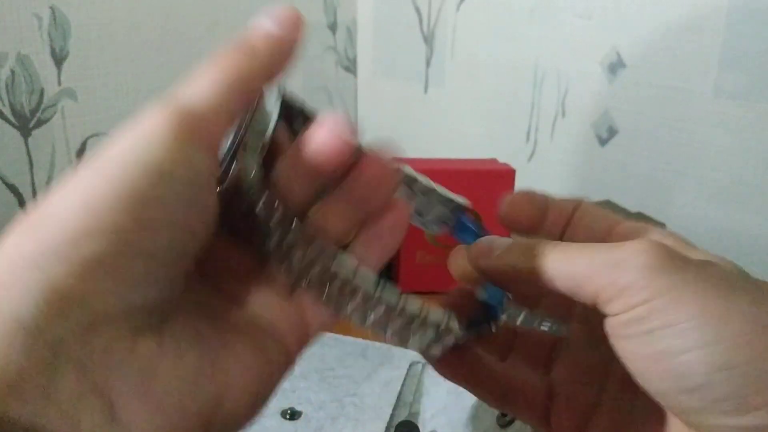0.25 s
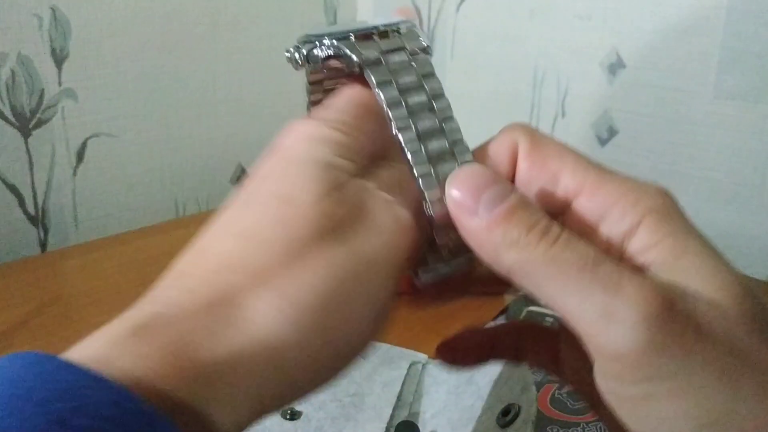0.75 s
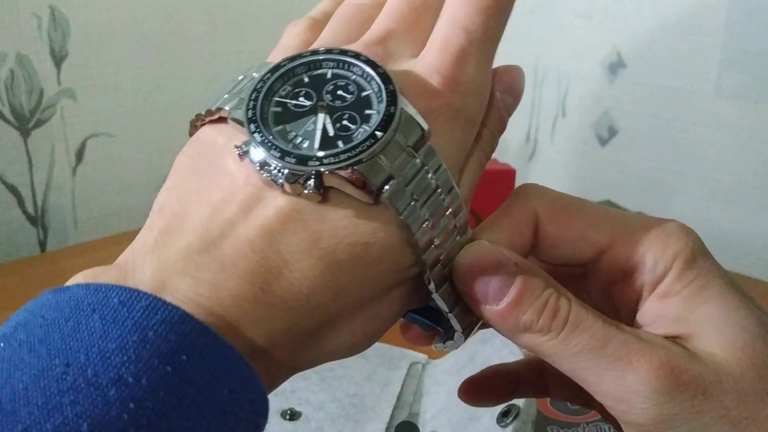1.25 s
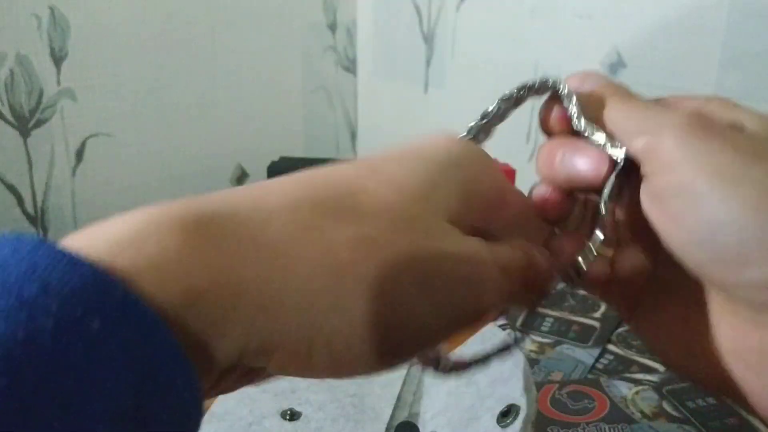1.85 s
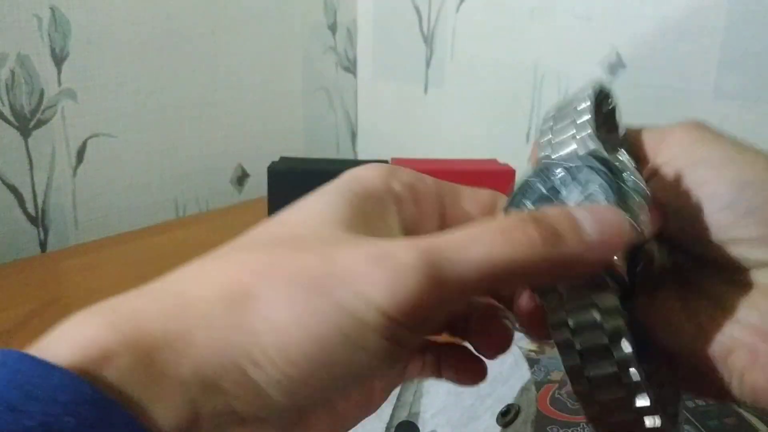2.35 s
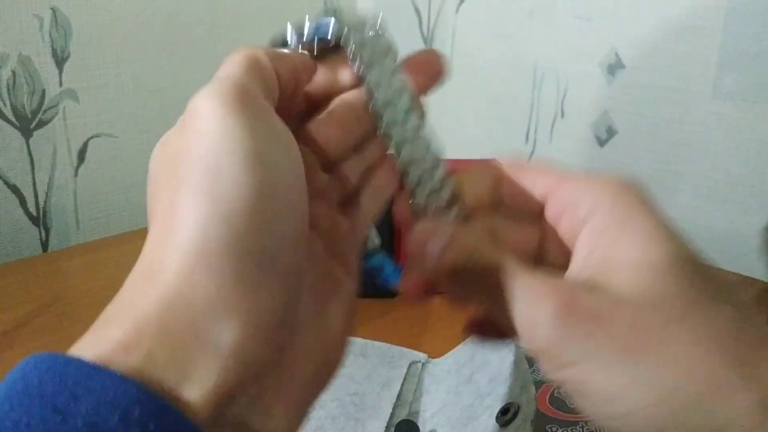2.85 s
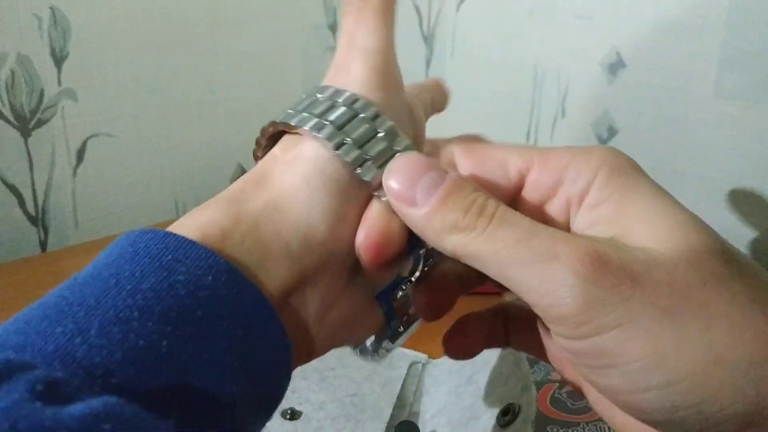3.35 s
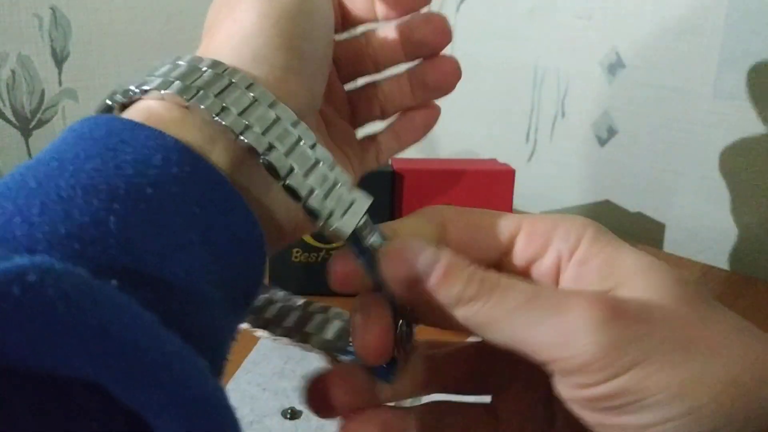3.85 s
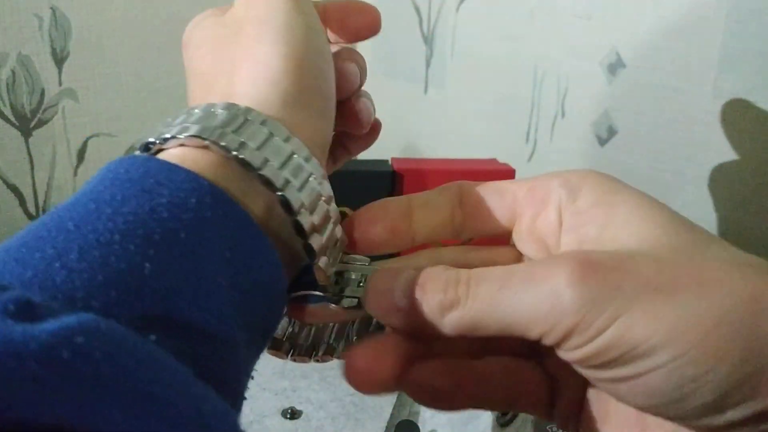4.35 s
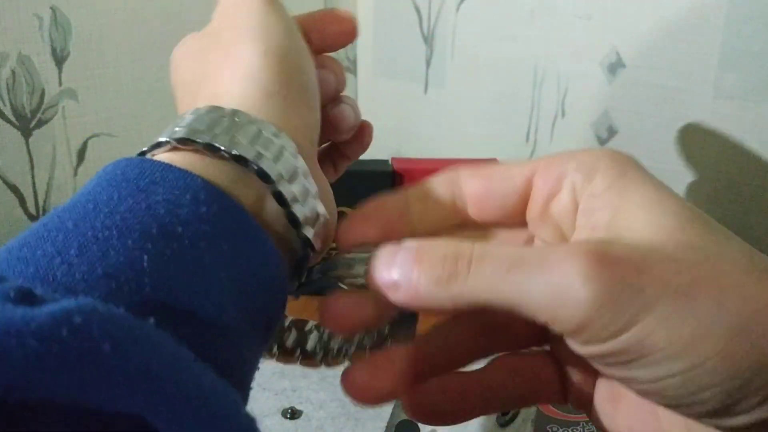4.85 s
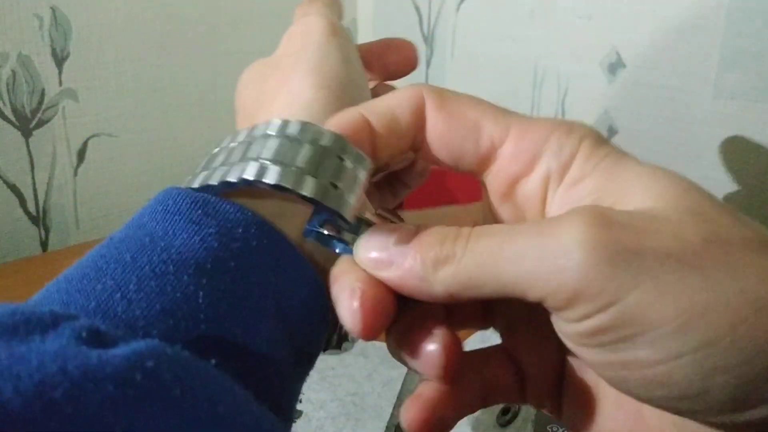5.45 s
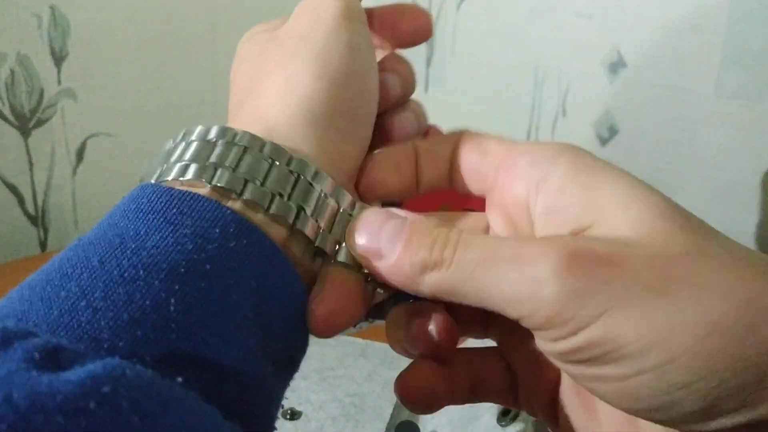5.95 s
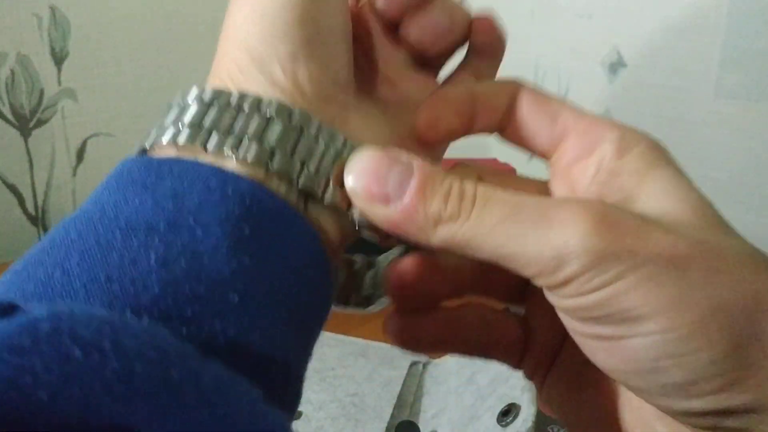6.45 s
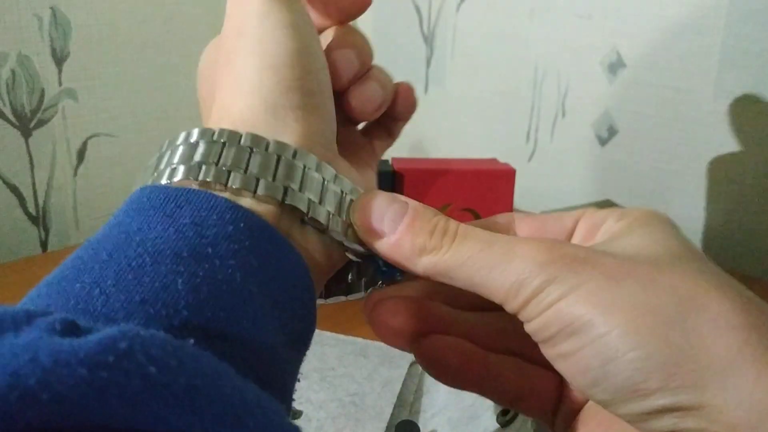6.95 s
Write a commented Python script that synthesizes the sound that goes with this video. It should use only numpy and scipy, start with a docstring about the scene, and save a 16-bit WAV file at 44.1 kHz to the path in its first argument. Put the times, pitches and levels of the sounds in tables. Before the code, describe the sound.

Close, thin metallic ticks and jingles come from the links of a steel watch band being handled indoors. The band rattles and scrapes most as it is pulled onto a wrist, lightly brushing skin and sleeve, then the clasp gives several crisp clicks among smaller link ticks. The hinge squeaks faintly now and then. Behind it are only quiet room tone, a faint wavering hum and occasional soft bumps.

```python
"""A quiet room, close to a pair of microphones: a steel watch bracelet is turned in the hands, slid over
a wrist and clasped. Links click, scrape and bump in runs of tiny contacts that ring the steel and the
watch case and thud in the hand. In between, the whole chain rattles and slides over a rub of skin and
cloth, and a hinge pin squeaks. Room tone, a wavering hum and a few soft thumps lie underneath."""
import sys
import numpy as np
from scipy import signal
from scipy.io import wavfile

SR = 44100
rng = np.random.default_rng(int(sys.argv[2]) if len(sys.argv) > 2 else 0)


def to_wav(s):
    """Save 16-bit WAV."""
    ch = np.atleast_2d(s).T  # columns
    pcm = np.round(np.clip(ch, -1, 1) * 32767)  # PCM
    wavfile.write(sys.argv[1], SR, pcm.astype(np.int16))


N = 317061

# modes of the steel links, large parts first: (pitch [Hz], level [dB])
LINK_MODES = [(3960, 6), (4380, 8), (5010, 7), (5440, -2.5), (6050, 6), (6480, 5), (7050, 0.5), (7500, -2),
              (7930, 2.5), (8520, -4.5), (9040, -4), (9530, -1.5), (10400, -2.5), (10900, -5.5),
              (11800, -1), (12800, -10.5), (13800, -4.5), (14700, -5), (15500, -9.5)]
AT_REST_DB = -67.5   # faint rattle while the chain is held still
THUD_FOLLOWS_CASE = 0.62   # dB more hand thud per dB more case ring, in clicks and scrapes


def from_db(db):
    """Decibels to gain."""
    return 10 ** (np.asarray(db) / 20)


def rms_one(x):
    """Scale to rms 1."""
    return x / np.sqrt(np.mean(x ** 2) + 1e-20)


def with_energy(x, energy):
    """Scale each row to the given energy."""
    return x * np.sqrt(energy / np.sum(x ** 2, axis=-1, keepdims=True))


def at_hz(points, hz):
    """Read a curve on a log-frequency axis."""
    point_hz, values = np.transpose(points)
    return np.interp(np.log(hz), np.log(point_hz), values)


def drift(rate_hz):
    """A smooth random wander of rms about 1."""
    step = 40   # samples between drawn points
    r = np.exp(-2 * np.pi * rate_hz * step / SR)
    slow = signal.lfilter([1], [1, -2 * r, r * r], rng.standard_normal(N // step + 2002))[2000:]
    return np.interp(np.arange(N) / step, np.arange(len(slow)), rms_one(slow))


def band(x, low_hz, high_hz):
    """Band-pass."""
    return signal.sosfilt(signal.butter(2, [low_hz, high_hz], "band", fs=SR, output="sos"), x)


def low_cut(x, hz):
    """Steep high-pass: small parts radiate no lows."""
    return signal.sosfilt(signal.butter(4, hz, "high", fs=SR, output="sos"), x)


def panned(pan_db):
    """Left and right gains, the left pan_db above the right."""
    return from_db(np.array([pan_db / 2, -pan_db / 2]))


def resonator(hz, t60):
    """Filter coefficients of one mode: a unit click starts a decaying sine of height 1."""
    r, w = from_db(-60 / (t60 * SR)), 2 * np.pi * hz / SR
    return [0, np.sin(w)], [1, -2 * r * np.cos(w), r * r]


def ring(drive, hz, t60):
    """Ring one mode at a steady pitch."""
    return signal.lfilter(*resonator(hz, t60), drive + 1e-18)


def room_tone(level_db, patchy_db):
    """Low hum of the house and microphone hiss: half-octave noise bands, each wavering in level."""
    # spectrum of the noise floor: (frequency [Hz], relative density [dB])
    spectrum = [(25, 1), (60, -40), (100, -19.5), (140, -17), (210, 0), (300, -5.5), (420, -7), (700, -11),
                (1300, -13.5), (2300, -15.5), (3600, -17.5), (6000, -21.5), (15000, -17.5), (16500, -38)]
    # how alike left and right are: (frequency [Hz], correlation [-1 to 1])
    likeness = [(60, 0.8), (240, 0.32), (950, -0.1), (3770, 0.078), (15000, -0.68)]
    edges_hz = 25 * 2 ** np.arange(0, 9.6, .5)
    white = rng.standard_normal((2, 2, N))
    out = 0
    for k, (low, high) in enumerate(zip(edges_hz, edges_hz[1:])):
        mid, side = band(white[k % 2], low, high)
        hz = np.sqrt(low * high)
        alike = at_hz(likeness, hz)
        gain = from_db(at_hz(spectrum, hz) + patchy_db * drift(13.8))
        out += gain * (np.sqrt(1 + alike) * mid + np.sqrt(1 - alike) * side * [[1], [-1]])
    return from_db(level_db) * rms_one(out)


def hum(hz, level_db, t60):
    """A wavering hum in the room: noise twice through one low resonance."""
    once = ring(rng.standard_normal(N), hz, t60)
    return from_db(level_db) * rms_one(ring(once, hz, t60))


def thumps(low_hz, high_hz):
    """Soft thumps, as of arms on the table: puffs of low noise that swell and die."""
    # the puffs: (peak time [s], level [dB], rise and fall over 20 dB [s])
    puffs = [(.0, -50.5, 0.042), (0.867, -61, 0.097), (1.872, -56, 0.036), (2.673, -57, 0.063),
             (3.018, -63, 0.052), (3.054, -57.5, 0.18), (5.853, -61, 0.083), (6.06, -58, 0.028),
             (6.418, -54, 0.054), (7.077, -59, 0.075)]
    t = np.arange(N) / SR
    envelope = sum(from_db(db - 20 * np.abs(t - s) / length) for s, db, length in puffs)
    mid, side = band(rng.standard_normal((2, N)), low_hz, high_hz)
    return low_cut(envelope * rms_one(mid + 0.5 * side * [[1], [-1]]), 96)


def slide_levels():
    """Levels in dB of small and large links: each slide swells and dies, and overlaps add in power."""
    # slides and swings of the chain: (peak time [s], small links [dB],
    # large links over small [dB], rise over 20 dB [s], fall over 20 dB [s])
    slides = [(.005, -29.5, 3.5, 0.11, 0.015), (0.131, -47.5, 0.5, 0.12, 0.045), (.26, -45, 1, 0.11, 0.13),
              (0.398, -42.5, -3.5, 0.033, 0.067), (.59, -42, -3.5, 0.11, 0.13),
              (.87, -42, -3.5, 0.23, 0.22), (.98, -57, -5, 0.071, 0.054), (1.62, -45.5, -6.5, 0.09, 0.14),
              (1.79, -37.5, -4.5, 0.13, 0.14), (2.09, -48.5, -2.5, 0.15, 0.14),
              (2.25, -47, -6, 0.055, 0.042), (2.36, -56, -5, 0.043, 0.18), (2.49, -37.5, -5, 0.14, 0.28),
              (2.678, -37.5, -1.5, 0.033, 0.027), (2.87, -47, -6.5, 0.21, 0.17),
              (2.99, -28.5, -6.5, 0.079, 0.13), (3.1, -38, 8.5, 0.094, 0.061),
              (3.269, -33, 2.5, 0.11, 0.12), (3.442, -33.5, 0, 0.068, 0.11), (3.6, -37.5, -4.5, 0.076, 0.1),
              (3.76, -46.5, -8, 0.14, 0.073), (3.83, -50, -12.5, 0.076, 0.25),
              (4.004, -33.5, -7.5, 0.077, 0.082), (4.33, -53.5, -4, 0.28, 0.19),
              (4.55, -58.5, 3, 0.3, 0.057), (4.75, -42.5, -4.5, 0.18, 0.021), (4.87, -47.5, -4, 0.21, 0.17),
              (5.09, -49, -4.5, 0.59, 0.23), (5.21, -61, -16, 0.068, 0.072), (5.4, -53, -3, 0.24, 0.55),
              (5.69, -52.5, 0.5, 0.018, 0.095), (5.82, -45.5, -1, 0.077, 0.14),
              (6.067, -42.5, -0.5, 0.11, 0.054), (6.2, -44.5, -6, 0.083, 0.14),
              (6.281, -46, -4, 0.058, 0.073), (6.42, -44, -7, 0.04, 0.42), (6.54, -44.5, 0.5, 0.17, 0.12),
              (6.71, -39.5, -6, 0.018, 0.054), (6.817, -39, -3, 0.11, 0.042),
              (7.061, -45.5, -0.5, 0.11, 0.11)]
    t = np.arange(0, N + 64, 64) / SR
    peak_s, peak_db, large_over_db, rise, fall = np.transpose(slides)[:, :, None]
    small_db = peak_db - 20 * np.where(t < peak_s, (peak_s - t) / rise, (t - peak_s) / fall)
    powers = [np.sum(from_db(2 * db), axis=0) + from_db(2 * AT_REST_DB)
              for db in (small_db, small_db + large_over_db)]
    return [np.interp(np.arange(N) / SR, t, 10 * np.log10(power)) for power in powers]


def contacts(per_s, spread_db, clump_db):
    """Random touches in clumps, many weak and a few strong, with their own strength at each microphone."""
    touching = rng.random(N) < per_s * from_db(clump_db * drift(40)) / SR
    strength = from_db(spread_db * np.minimum(rng.exponential(1, N), 4))
    return strength * touching * rng.standard_normal((2, N))


def gripped_ring(drive, hz, t60, grip_shift=0.07):
    """A part rings at a pitch that shifts with the grip, about every tenth of a second."""
    block, state, out = 4096, np.zeros((2, 2)), np.empty_like(drive)
    for at in range(0, N, block):
        grip_hz = min(hz * (1 + grip_shift * rng.standard_normal()), 16000)
        span = slice(at, at + block)
        out[:, span], state = signal.lfilter(*resonator(grip_hz, t60), drive[:, span] + 1e-18, zi=state)
    return out


def rattle(touches, parts, cycles, tilt_db_per_oct, neighbour_share=0.45, swing_db=3.5):
    """Each touch rings one part and jolts the others; grip and slack let each part come and go."""
    struck_part = rng.integers(0, len(parts), N)
    lowest_hz = parts[0][0]
    rings = 0
    for k, (hz, db) in enumerate(parts):
        gain = from_db(db + tilt_db_per_oct * np.log2(hz / lowest_hz) + swing_db * drift(23.3))
        drive = touches * np.where(struck_part == k, 1, neighbour_share)
        rings += (-1) ** k * gain * gripped_ring(drive, hz, cycles / hz)
    return rms_one(low_cut(rings, 0.64 * lowest_hz))


def chain(calm_db=11.5, busiest=0.92):
    """The sliding chain: links and case rattle together while skin and cloth rub below."""
    # rub of skin and cloth: (time [s], level over the large links [dB])
    rub_curve = [(0, -16), (.3, -21), (.6, -20), (.9, -14.5), (1.3, -34), (1.75, -24), (2.1, -16.5),
                 (2.5, -20.5), (2.9, -11), (3.1, -28.5), (3.35, -17), (3.8, -19), (4.301, -15.5),
                 (4.8, -14), (5.3, -19), (5.8, -25), (6.1, -12.5), (6.5, -21), (6.8, -20), (7.19, -20)]
    small_db, large_db = slide_levels()
    case_db = large_db.mean() + 0.99 * (large_db - large_db.mean()) - 8
    rub_db = large_db + np.interp(np.arange(N) / SR, *np.transpose(rub_curve))
    ticks = rms_one(contacts(per_s=2000, spread_db=2.0, clump_db=3.5))
    # within calm_db of rest, the separate touches blur into smooth noise
    busy = np.clip((small_db - AT_REST_DB) / calm_db, 0, busiest)
    touches = busy * ticks + np.sqrt(1 - busy ** 2) * rng.standard_normal((2, N))
    case_modes = [(hz, 0) for hz in np.geomspace(2050, 3950, 8)]
    small = from_db(small_db) * rattle(touches, LINK_MODES[9:], cycles=45, tilt_db_per_oct=1.1)
    large = from_db(large_db) * rattle(touches, LINK_MODES[1:9], cycles=42, tilt_db_per_oct=5.5)
    case = from_db(case_db) * rattle(touches, case_modes, cycles=51, tilt_db_per_oct=2.8)
    narrowed = touches + 0.28 * touches[::-1]   # each side bleeds into the other
    rub = from_db(rub_db) * rms_one(band(band(narrowed, 290, 1500), 700, 1790))
    return panned(-1.2)[:, None] * (small + large + case + rub)


def gripped_case_hz(hz):
    """The pitch of the case shifts a little with the grip from knock to knock."""
    return hz * (1 + 0.08 * rng.uniform(-0.33, 1))


def clicks():
    """Rows for knocks(): sharp clicks of links and clasp, each with a slightly softened onset."""
    # the clicks: (time [s], level [dB], link centre [Hz], case ring over links [dB],
    # fall over 10 dB [ms], left over right [dB])
    click_cues = [(0.023, -25, 12300, -15, 0.94, 1), (0.114, -36, 8900, -3, 1, 0),
                  (.1331, -42, 10000, -20, 1, 0), (0.143, -33, 11100, -12, 2.1, 3),
                  (0.186, -37.5, 10800, -18, 1.4, -6), (0.2657, -23.5, 12300, -43, 4, -3),
                  (0.3436, -31.5, 12500, -29, 5.2, 3), (0.5123, -31, 11200, -44, 0.35, -5),
                  (0.519, -34.5, 7700, -16, 2.8, -4), (0.868, -24, 7500, -20, 0.83, -2),
                  (0.886, -39, 8500, -25, .8, 0), (.538, -41, 10000, -9, 3, 3),
                  (0.5762, -31.5, 8840, -12.5, 10, -1), (.659, -49, 10000, -20, 1, -2),
                  (.7441, -37, 9000, -19, 1.5, 0), (0.7347, -27, 10700, -12.5, .5, 0),
                  (0.294, -34.5, 11800, -11, 4, -2), (0.856, -20.5, 9150, -24.5, 5.8, -3),
                  (1.7754, -33, 10900, -18, 1.3, 6), (1.1232, -33, 8200, -35, 0.66, -3),
                  (1.1922, -29.5, 9900, -17.5, 1.1, -5), (1.287, -46.5, 6900, -4, 0.68, -5),
                  (1.455, -47.5, 7700, -13, 1.2, 4), (1.56, -45, 8000, -20, 2.2, -2),
                  (1.585, -32, 13900, -28, 2.6, 3), (1.5984, -16, 11100, -23, 0.31, -6.5),
                  (1.66, -32.5, 8850, -34, 14, -4), (1.747, -36, 9000, -18, 1, 0),
                  (1.815, -35.5, 9000, -3, 1.5, -2), (1.7287, -29.5, 10800, -39, 2.4, 2),
                  (2.0097, -37.5, 12200, -19, 5.7, 2), (2.0698, -49, 10000, -18, 1, 0),
                  (2.0838, -22.5, 8300, -12, 2.7, -3), (2.1945, -36.5, 11700, -27, 4.3, -2),
                  (2.2086, -29, 11300, -12, 0.52, 1), (2.231, -32, 10000, -12, 5.6, 0),
                  (2.2422, -35, 12500, -32, 1.8, -2), (2.2586, -21, 9300, -18, 3.2, 1),
                  (2.2873, -14.5, 12500, -27.5, 0.43, -1), (2.3388, -20, 12000, -25.5, 5.4, 0),
                  (2.3824, -34, 10000, -8.5, 1.1, 0), (2.397, -36, 9900, -22, 1, 0),
                  (2.4392, -33, 10100, -9.5, 3.7, -5), (2.4456, -33, 11000, -20, 1, 2),
                  (2.465, -26.5, 11600, -11.5, 2.4, 9), (2.532, -29, 11000, -18, 1.4, -1),
                  (2.5375, -38, 9500, -22, 1, 0), (2.694, -24, 8500, -29, 1.5, -2),
                  (2.769, -33.5, 6300, -14.5, 7.4, 1.5), (2.8233, -27, 9700, -38, 1.4, -3),
                  (2.835, -42, 12600, -26, 1.7, 9), (2.842, -43, 9200, 1.5, 1.4, 2),
                  (2.873, -34, 6940, -17, 1.5, 1), (2.8591, -42, 11000, -29, 1.5, 0),
                  (2.8852, -23, 11100, -17, 0.54, -1), (2.898, -29.5, 9300, -16.5, 8.1, -1),
                  (2.9333, -21.5, 7200, -19, 1.9, -1), (3.212, -34, 6000, -28, 4.2, -11),
                  (3.3231, -33, 7000, -25, 1.1, -6), (3.397, -29, 6840, -33, 2.8, -16),
                  (3.412, -26, 7600, -31, 1.4, -5), (3.417, -26.5, 4770, -13, 23, -4),
                  (3.5828, -25.5, 9000, -42, 7.5, -6), (3.6593, -18, 12100, -25, 2.4, -1),
                  (3.615, -35, 10000, -23, 1, 2), (3.695, -32, 10100, -21, 1, 0),
                  (3.7354, -29, 11200, -48, 3.1, 1), (3.8293, -28.5, 9000, -6, 1.5, 1),
                  (3.8105, -15, 12300, -33, 0.67, -2), (3.8142, -34, 7540, -15, 2.1, 4),
                  (3.8367, -37, 7500, -10, 1.5, 0), (3.842, -46, 9000, 4, 3.4, 1),
                  (3.8253, -23, 11000, -19.5, 2.4, 3), (3.9044, -32, 11000, -25, 1, 2),
                  (3.9138, -24.5, 12300, -20, 2, 1.5), (3.918, -29, 10000, -15, 1.6, -1),
                  (3.9695, -31, 8000, -16, 0.87, -7), (3.9475, -31, 10700, -28, 1.4, -1),
                  (3.978, -18, 9600, -14, 0.77, -2), (4.046, -22, 11900, -19.5, 1.1, 2),
                  (4.076, -29, 8900, -18, 0.44, -2), (4.102, -28.5, 8200, -22, 1.1, -2),
                  (4.154, -33, 13500, -35, 2.4, 2), (4.1606, -25, 12700, -21, 0.47, 0),
                  (4.174, -33.5, 7700, -22, 2.5, -5), (4.241, -41, 10900, -20, .8, -1),
                  (4.277, -34.5, 11200, -22, 0.68, -7), (4.286, -46, 11000, -23, 1.5, -1),
                  (4.466, -50, 6000, 0, 0.8, -2), (4.587, -35, 11200, -16, 0.7, -2),
                  (4.644, -40, 11300, -23, 1.9, -3), (4.6632, -45, 10000, -25, 1, -5),
                  (4.7052, -19.5, 11000, -39, 0.6, -6), (4.723, -33, 7900, -20, 1.9, 3),
                  (4.7388, -12, 9300, -34, 0.68, -3), (4.7407, -27, 8950, -33, 2.3, 0),
                  (4.7894, -11, 6030, -20.5, 0.8, 1), (4.7896, -21, 12100, -30, 1.5, -4),
                  (4.8105, -21, 9000, -17, 1.3, -3), (4.855, -30, 10000, -22, 1.1, 0),
                  (5.069, -32, 12400, -21, 0.28, 0), (5.076, -29.5, 11600, -18.5, 5.6, 1),
                  (5.107, -27, 13300, -40, 3.5, -5), (5.1913, -8, 12200, -39, 0.14, 2.5),
                  (5.303, -30.5, 13700, -42, 1.4, -5), (5.3414, -25, 9000, -18.5, 2.1, 1),
                  (5.418, -25, 9100, -30, 0.88, -6), (5.4401, -17, 12600, -18.5, 0.18, -1),
                  (5.579, -38, 11000, -27, 0.89, -5), (5.596, -22.5, 6100, -11.5, 1.36, -2),
                  (5.6412, -30, 10600, -34, 0.34, -6), (5.721, -44, 10000, -10, 1, 0),
                  (5.7481, -27.5, 9300, -20, 1.5, -2), (5.79, -34, 10700, -30, 1.2, -7),
                  (5.753, -28, 9800, -6, 1.3, -2), (5.782, -34, 9000, -24, 1.5, -3),
                  (5.8, -36, 11000, -25, .8, -4), (5.81, -20, 11300, -28, .4, 3),
                  (5.8173, -15.5, 11800, -29, 0.33, -6), (5.835, -34, 11000, -8, 4.5, 8),
                  (5.8475, -22, 8400, -6, 2.8, 0), (5.9732, -31.5, 10200, -13.5, 2, -4),
                  (5.9204, -41, 11000, -22, 1.2, -1), (6.0632, -41, 12000, -22, .6, -3),
                  (6.065, -37, 12300, -6, 1.5, -2), (6.0783, -34, 9000, -14, .6, 0),
                  (6.1656, -41, 8900, -15, 1.6, -4), (6.203, -36, 8000, -15, 2, -11),
                  (6.341, -35, 8000, -7, 1.1, -1), (6.3445, -29.5, 6800, -6, 2.2, -5),
                  (6.378, -20, 6400, -25, 1.3, -8.5), (6.361, -47, 12000, -25, 1.5, 0),
                  (6.416, -37, 10000, -25, 1.5, 2), (6.4642, -26, 11900, -21, 1.9, 1),
                  (6.612, -31.5, 9800, -43, 3.4, 1), (6.6592, -28.5, 9700, -43, 4, 4),
                  (6.673, -20.5, 10400, -38, .4, -6), (6.686, -31, 12300, -70, 2.5, 9),
                  (6.6996, -33, 7000, -11, 1.5, 0), (6.7193, -23.5, 9800, -26, 5.3, -2.5),
                  (6.805, -19, 7900, -24, 1.9, -4), (6.834, -31, 10400, -35, 3.9, -1),
                  (6.8576, -33, 12000, -33, 1.7, 0), (6.9364, -39, 10000, -25, 1.9, 0),
                  (6.9834, -44, 9000, -25, 1, -4), (7.0108, -47, 10000, -25, 1, 0),
                  (7.163, -38.5, 9900, -27, 1, -5), (6.906, -35, 6600, -27, 1.6, -3),
                  (6.921, -42, 9700, -14, 2.5, -3), (7.0343, -36, 8900, -9, 3.4, -14)]
    rows = []
    for s, db, link_hz, case_db, fall_ms, pan_db in click_cues:
        thud_db = -23 + THUD_FOLLOWS_CASE * case_db
        rise_ms = 0.57 + 0.27 * fall_ms
        rows.append((s, db, link_hz, gripped_case_hz(2660), case_db, thud_db, rise_ms, fall_ms, pan_db))
    return rows


def contact_runs(envelope, peak_at, alike=0.37, grain_db=1.5, strike=2.33):
    """Grainy runs of tiny contacts: a part both microphones share, and a part of their own for each."""
    count, _, size = envelope.shape
    white = rng.standard_normal((count, 3, size))
    grain = from_db(grain_db * rng.standard_normal((count, 1, size // 8)).repeat(8, axis=2))
    runs = envelope * grain * white
    shared, own = runs[:, :1], runs[:, 1:]
    shared[:, :, peak_at] = strike * np.sign(shared[:, :, peak_at]) / alike   # one firm contact on top
    # three blends, to drive link, case and hand
    return alike * shared + (1 - alike) * own, shared + 1.32 * own, shared + 0.19 * own


def link_ring(drive, centre_hz, spread_oct=0.25, cycles=33):
    """A struck link: modes near its centre ring loudest, a little differently at each microphone."""
    mode_hz, mode_db = np.transpose(LINK_MODES)
    weight_db = mode_db - 3 * (np.log2(mode_hz / centre_hz) / spread_oct) ** 2
    weight_db = weight_db + rng.normal(0, 0.4, (len(drive), 2, len(mode_hz)))
    modes = sum(from_db(weight_db[:, :, [k]]) * np.sqrt(hz) * ring(drive, hz, cycles / hz)
                for k, hz in enumerate(mode_hz))
    return low_cut(low_cut(np.diff(modes, prepend=0), 2720), 2670)


def case_ring(drive, centre_hz, spread_oct=0.36, cycles=8.5):
    """The struck case: a short, lower ring, loudest near its centre, through each resonance twice."""
    modes = 0
    for k, hz in enumerate(np.geomspace(950, 3900, 11)):
        gain = hz * from_db(-3 * (np.log2(hz / centre_hz) / spread_oct) ** 2)
        modes += (-1) ** k * gain * ring(ring(drive, hz, cycles / hz), hz, cycles / hz)
    return low_cut(modes, 740)


def hand_thud(drive, hz=588):
    """The hand takes the knock as a dull band of noise."""
    return low_cut(band(drive, 0.6 * hz, 2.57 * hz), 193)


def table_ring(drive):
    """The table rings low under the thuds."""
    # modes of the table: (pitch [Hz], gain [dB], decay over 60 dB [s])
    table_modes = [(304, -33.5, 0.021), (404, -54, 0.23)]
    return sum(from_db(db) * ring(drive, hz, t60) for hz, db, t60 in table_modes)


def knocks(rows, trim_db, max_lag_samples):
    """Each knock is a run of contacts that swells and dies, sounding link, case, hand and table."""
    size, lead = 2048, 640   # samples in a knock, and ahead of its peak
    columns = np.transpose(rows)[:, :, None, None]
    s, level_db, link_hz, case_hz, case_db, thud_db, rise_ms, fall_ms, pan_db = columns
    ms = (np.arange(size) - lead) / SR * 1000
    envelope = from_db(np.where(ms < 0, 10 * ms / rise_ms, -10 * ms / fall_ms))
    link_drive, case_drive, hand_drive = contact_runs(envelope, lead)
    # the ring outlasts the shortest contacts and adds to their energy
    energy = np.sum(envelope ** 2, axis=2, keepdims=True) + 12
    link = with_energy(link_ring(link_drive, link_hz), energy)
    case = from_db(case_db) * with_energy(case_ring(case_drive, case_hz), energy)
    thud = from_db(thud_db) * with_energy(hand_thud(hand_drive), energy)
    blows = from_db(level_db + trim_db) * (link + case + thud)
    # off the middle, a knock reaches one microphone a little later
    lags = np.round(max_lag_samples * rng.uniform(-1, 1, len(rows))).astype(int)
    starts = np.round(s.ravel() * SR).astype(int)
    out = np.zeros((2, N + size + 20))
    for at, lag, blow, gains in zip(starts, lags, blows, panned(pan_db.ravel()).T):
        out[0, at + lag:at + lag + size] += gains[0] * blow[0]
        out[1, at:at + size] += gains[1] * blow[1]
    out = out[:, lead:N + lead]
    return out + table_ring(out)


def bumps(rise_ms=1, pan_db=-1.5):
    """Rows for knocks(): heavier blows of steel against case, hand or wrist."""
    # the bumps: (time [s], level [dB], link centre [Hz], case centre [Hz],
    # case ring over links [dB], thud over links [dB], fall over 10 dB [ms])
    bump_cues = [(0.079, -32.5, 10400, 2920, -9.5, -12, 1.3), (0.7595, -19.5, 11600, 2600, -10, -19.5, 3.8),
                 (1.0663, -39, 10000, 2600, -20, -32, 1), (1.057, -19, 8200, 2840, -8, -22, 0.47),
                 (2.6305, -38, 12100, 2870, -27, -17, 1.5), (3.373, -26, 10900, 2760, -17, -11.5, 2.8),
                 (3.8104, -25.5, 7900, 3400, 2, -63, 0.57), (3.885, -38.5, 11000, 2550, -10, -15.5, 16),
                 (3.982, -25.5, 9600, 1360, -13.5, -45, 8.2), (4.942, -32, 7740, 2660, -7, -16, 3.6),
                 (4.986, -27.5, 9500, 1350, -29, -15, 0.23), (5.517, -26, 11600, 2260, -14.5, -28, 2.7),
                 (6.2702, -40, 10200, 1030, 5, -4, 0.93), (6.305, -38.5, 9000, 2590, -7, -31, 2.4),
                 (6.554, -48, 9000, 1220, -7, 2, 0.69), (6.377, -12.5, 10600, 1280, -21.5, -11, 0.81),
                 (7.041, -19, 7560, 2100, -14.5, -24, 1.7)]
    return [(*bump, rise_ms, fall_ms, pan_db) for *bump, fall_ms in bump_cues]


def scrapes(usual_db=-28.5, pan_db=-2):
    """Rows for knocks(): links dragged over links; strong scrapes hang free of the hand and thud less."""
    # the scrapes: (peak time [s], level [dB], link centre [Hz], case ring over links [dB],
    # rise over 10 dB [ms], fall over 10 dB [ms])
    scrape_cues = [(0.2263, -36.5, 10000, -11.5, 4.5, 11), (0.3994, -35.5, 7600, -10.5, 31, 4.1),
                   (0.601, -36.5, 9500, -15.5, 20, 19), (0.846, -31, 10900, -14, 10, 3.8),
                   (0.8723, -28, 7900, -29, 16, 26), (0.9333, -26, 7800, -12, 1.4, 0.27),
                   (1.648, -33, 9300, -12.5, 4.7, 2.6), (1.771, -32, 10900, -31, 8.5, 4),
                   (1.7921, -21, 12100, -12.5, 2, 9.4), (2.499, -34, 10100, -6.5, 7.6, 4),
                   (2.6689, -30.5, 10400, -3, 2.9, 1.4), (2.9728, -16.5, 8360, -41, 6.7, 1.4),
                   (2.983, -10.5, 9500, -18, 3.2, 6.7), (3.051, -23.5, 9000, -19, 6.8, 7.9),
                   (3.0871, -24.5, 9800, -10, 1.2, 15), (3.1, -21, 10500, -31, 14, 14),
                   (3.233, -15.5, 5840, -31, 5.4, 7.9), (3.2578, -22.5, 5900, -37, 27, 28),
                   (3.278, -30.5, 6270, -20, 18, 94), (3.427, -26, 9100, -20, 14, 12),
                   (3.46, -36, 7300, -15, 11, 58), (3.482, -25, 7700, -13, 10, 10),
                   (3.368, -27.5, 10700, -13, 13, 14), (3.6154, -40.5, 11500, -7, 14, 2.8),
                   (4.54, -38, 9200, -7, 3.1, 3.4), (4.745, -28, 10100, -39, 4.1, 1.3),
                   (4.883, -31.5, 9900, -19, 24, 4.2), (6.456, -26.5, 9500, -18, 4.4, 6.8),
                   (6.5168, -32, 10900, -11, 2, 3.7)]
    rows = []
    for s, db, link_hz, case_db, rise_ms, fall_ms in scrape_cues:
        thud_db = -17 + THUD_FOLLOWS_CASE * case_db - 0.76 * (db - usual_db)
        rows.append((s, db, link_hz, gripped_case_hz(3130), case_db, thud_db, rise_ms, fall_ms, pan_db))
    return rows


def hinge_squeaks(t60):
    """Friction rings a turning hinge pin at its pitch and the octave: a thin squeak, slightly left."""
    # turns of the pin: (start [s], length [s], pitch [Hz], level [dB], octave over fundamental [dB])
    turns = [(1.855, .09, 3970, -50, -14), (2.18, .045, 3970, -52, -14), (2.225, .05, 3980, -46, -14),
             (2.96, .045, 3965, -34, 6), (3.585, .045, 3960, -47, -8), (5.095, .035, 4050, -53, -14),
             (5.195, .045, 3900, -56, -14)]
    out = np.zeros((2, N))
    for s, length, hz, level_db, octave_db in turns:
        at, size = round(s * SR), round(length * SR)
        friction = rng.standard_normal(size)
        tone = rms_one(ring(friction, hz, t60))
        tone += from_db(octave_db) * rms_one(ring(friction, 2 * hz, t60))
        out[:, at:at + size] += from_db(level_db) * np.hanning(size) * tone * [[1], [.8]]
    return low_cut(out, 1800)


def reverb(x, t60, wall_cut_hz):
    """Each microphone hears its own tail of decaying noise, dulled by the walls."""
    t = np.arange(round(.3 * SR)) / SR
    tail = rng.standard_normal((2, len(t))) * from_db(-60 * t / t60) * (t > .004)   # 4 ms pre-delay
    tail = signal.sosfilt(signal.butter(1, wall_cut_hz, fs=SR, output="sos"), tail)
    return signal.fftconvolve(x, tail / np.sqrt(np.sum(tail ** 2) / 2), axes=1)[:, :N]


def scene():
    """The bracelet and its reverb over room tone, hum and soft thumps."""
    bracelet = knocks(clicks() + scrapes() + bumps(), trim_db=-2, max_lag_samples=6.5)
    bracelet += chain() + hinge_squeaks(t60=0.07)
    wet = from_db(-13) * reverb(low_cut(bracelet, 1350), t60=0.39, wall_cut_hz=14800)
    ambience = room_tone(level_db=-60.5, patchy_db=3) + hum(hz=294.7, level_db=-75, t60=0.16)
    return bracelet + wet + ambience + thumps(low_hz=166, high_hz=400)


def record(dry):
    """Small bright capsules: the lows are thinned, the top is lifted, then cut off below 17 kHz."""
    lean = low_cut(dry, 52)
    bright = lean + 0.47 * band(lean, 11800, 15600)
    rolled_off = signal.sosfilt(signal.cheby2(12, 15, 16250, fs=SR, output="sos"), bright)
    return signal.sosfilt(signal.cheby2(20, 40, 16980, fs=SR, output="sos"), rolled_off)


dry = scene()
out = record(dry)
to_wav(out)
```